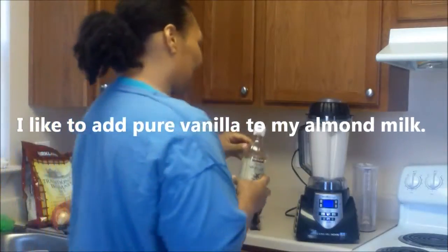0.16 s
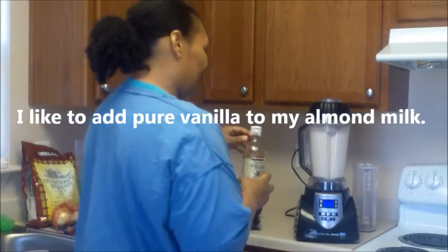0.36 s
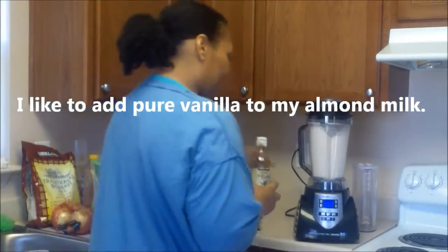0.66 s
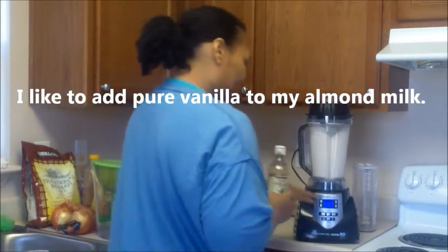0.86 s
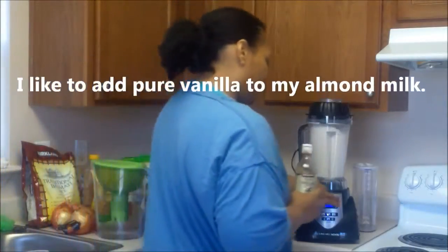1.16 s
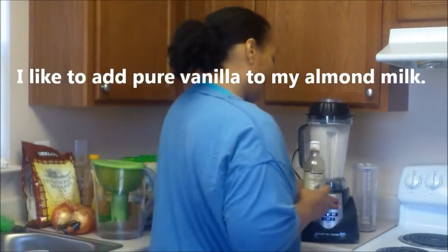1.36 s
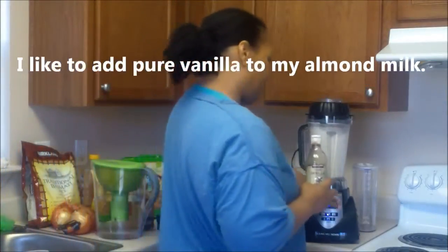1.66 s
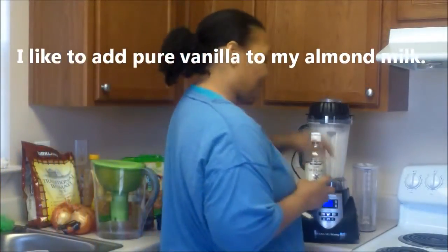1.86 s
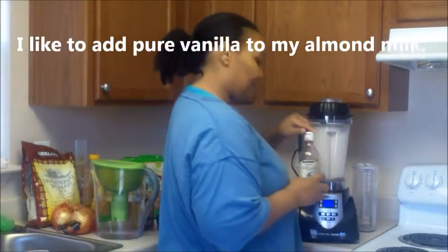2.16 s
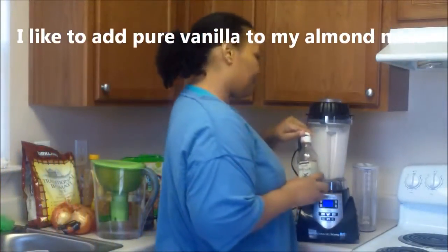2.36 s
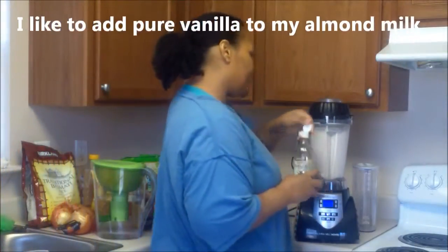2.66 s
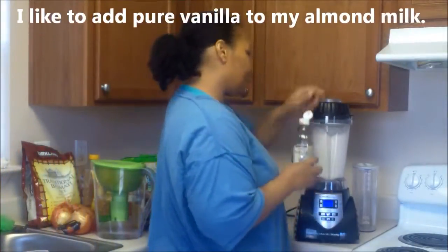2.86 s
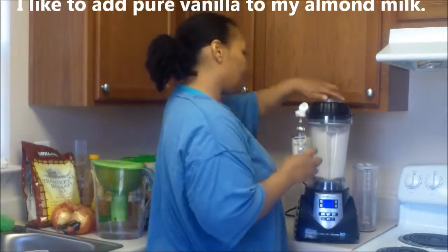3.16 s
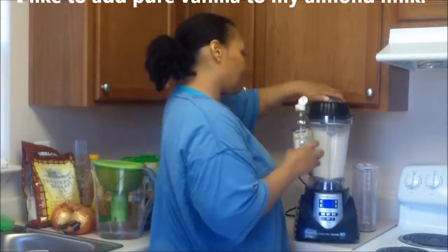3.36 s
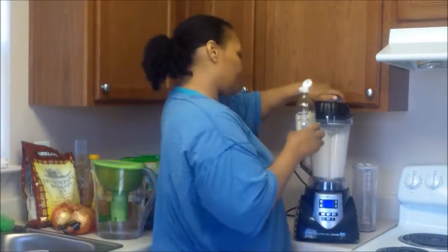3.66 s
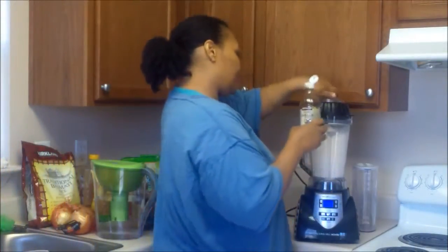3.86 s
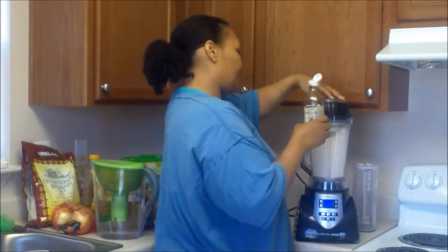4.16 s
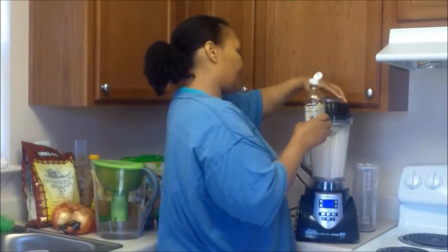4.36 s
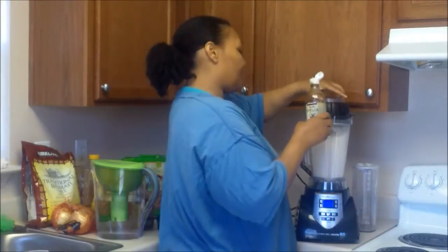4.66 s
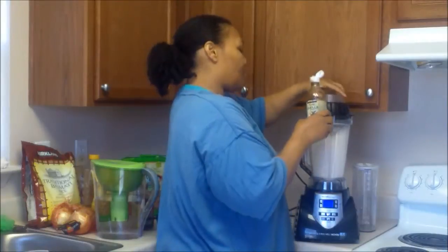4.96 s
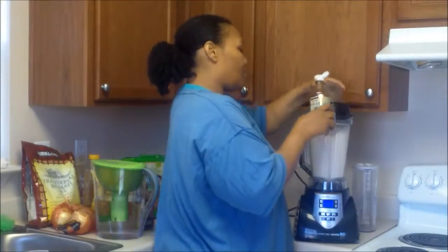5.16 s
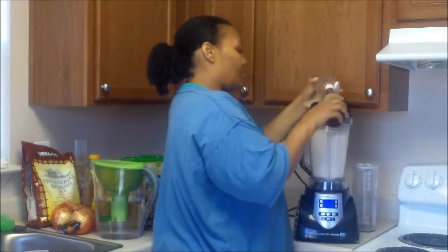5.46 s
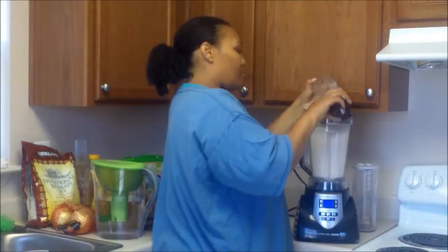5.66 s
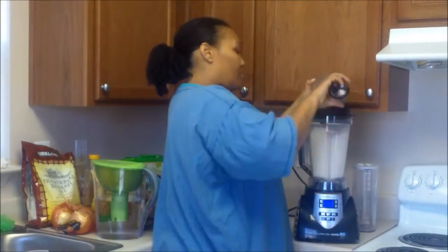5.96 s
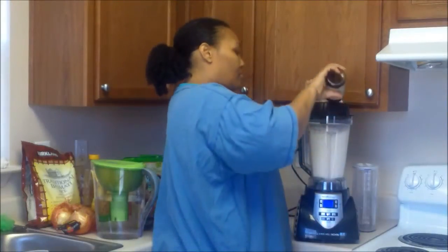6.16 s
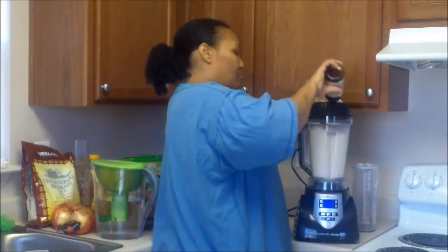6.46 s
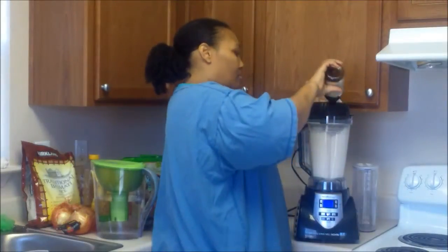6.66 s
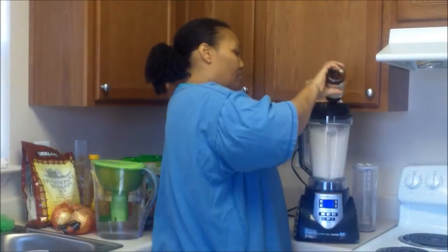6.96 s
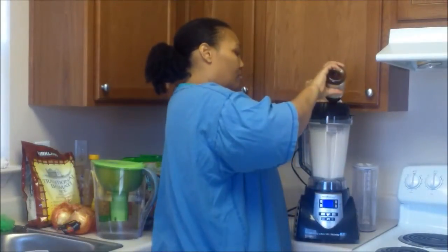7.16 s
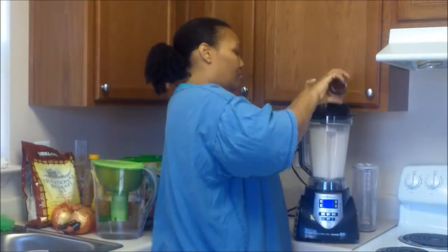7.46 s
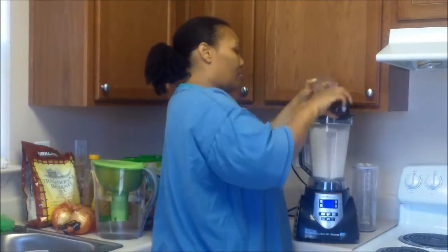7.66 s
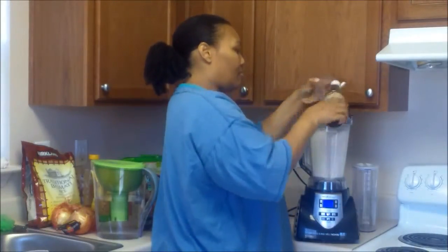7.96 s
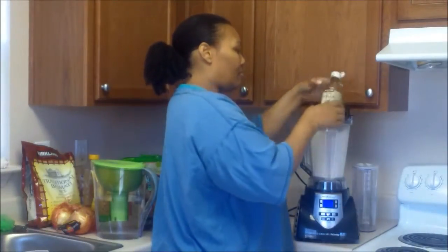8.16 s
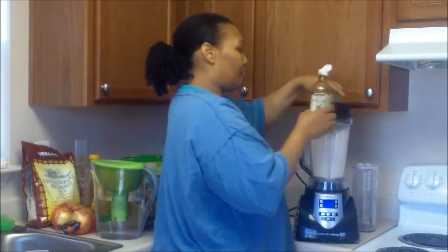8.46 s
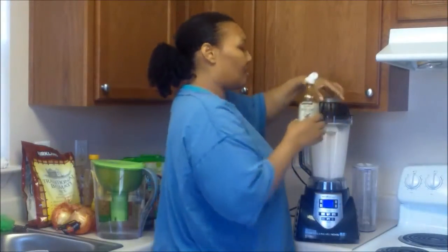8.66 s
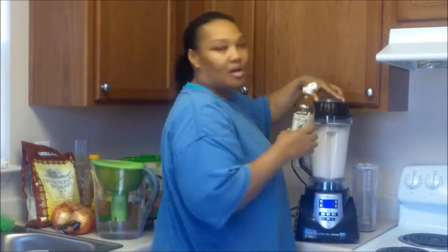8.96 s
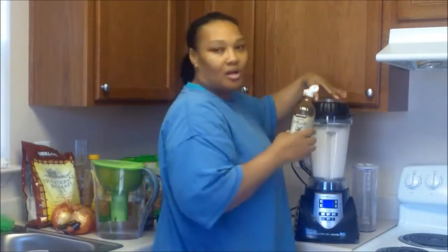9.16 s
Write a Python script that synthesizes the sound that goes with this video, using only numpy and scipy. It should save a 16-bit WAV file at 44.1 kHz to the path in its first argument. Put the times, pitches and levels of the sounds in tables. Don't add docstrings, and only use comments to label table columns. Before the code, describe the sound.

Loud, unbroken blender roar, close to constant in level, with a buzzing motor tone that wavers slightly in pitch. The liquid adds rough flutter and small airy gulps. After five seconds the opened jar sounds hollower and the motor overtones sing out more; after eight it closes again. Small room with short hard reflections, heard from a couple of metres on a simple microphone.

```python
import sys
import numpy as np
from scipy import signal
from scipy.fft import rfft, irfft
from scipy.io import wavfile
from scipy.ndimage import uniform_filter1d

SR = 44100
rng = np.random.default_rng(int(sys.argv[2]) if len(sys.argv) > 2 else 0)


def store_wav(level_fs):
    pcm = np.round(np.clip(np.atleast_2d(level_fs), -1, 1) * 32767)
    wavfile.write(sys.argv[1], SR, pcm.T.astype(np.int16))


def undo_db(level):
    steps = np.asarray(level, float) / 20
    return 10 ** steps


N = 410571
HZ = np.fft.rfftfreq(N, 1 / SR) + 1e-3

# [t/s, f/Hz]
SHAFT_SPEED = [(0.0, 295), (.35, 298.2), (1.1, 296.7), (1.55, 292), (1.78, 290.7), (2.0, 296.2),
               (2.4, 298.3), (2.85, 295.5), (5.3, 296.4), (5.55, 303.7), (6.05, 303), (6.4, 299.9),
               (7.1, 295), (7.55, 298), (7.78, 292.5), (8.15, 300.3), (8.95, 299.3), (9.31, 294.3)]
# [t/s, level/dB]
HUM = [(0, -32), (.2, -28), (1.15, -28), (1.6, -38), (1.82, -41), (2.0, -33), (2.45, -28), (2.85, -32.5),
       (3.4, -29), (3.7, -35.5), (4.2, -31), (5.1, -29), (5.45, -31), (6.2, -29), (7.7, -26.5),
       (8.25, -36.5), (8.75, -28.5), (9.31, -35)]
ORDERS = (1, 2, 3, 4, 44)
# [level at usual speed/dB, gain per extra Hz/dB, slow wander/dB]
OVERTONES = [(-44.5, -.3, 2), (-44.5, .5, .6), (-40, -.3, 1.5), (-54, -.5, 1.5)]
# [level/dB, phase/rad]
FLICKER = [(1.2, .15), (1.8, .4), (1.5, .8), (1.5, .25), (1.5, .3)]
# [t/s, length/s, order, lift/dB]
SINGS = [(.7, 0.55, 4, 4.5), (1.199, .7, 44, 3), (1.45, .5, 2, 3.5), (1.55, .3, 4, 4.5),
         (2.38, 0.077, 3, 8), (2.9, 0.61, 44, 4), (3.4, 1.03, 4, 5.5), (4.8, 0.22, 2, 8),
         (5.5, 0.66, 3, 11), (5.4, 1.2, 4, 6), (6.15, 0.34, 2, 10), (6.4, .25, 44, 6),
         (6.299, 1.05, 3, 10.5), (6.9, 1.05, 44, 5), (7.72, 0.18, 2, 12), (7.75, 0.57, 4, 8),
         (8.0, 0.52, 3, 9), (8.33, 0.19, 2, 8), (8.55, .8, 4, 8), (9.05, 0.32, 44, 6), (9.15, .3, 2, 10)]
USUAL_HZ, SING_FADE_S = 297, 0.11

# [t/s, level/dB]
ROAR = [(0.0, -14.5), (0.1, -14), (0.26, -17), (1.37, -14.5), (1.68, -17), (2.33, -14.5), (2.87, -15),
        (3.14, -14.5), (4.77, -14.5), (5.47, -14), (6.01, -16), (6.98, -14.5), (7.73, -15), (8.97, -14.5),
        (9.31, -15)]
# [f/Hz, density/dB per Hz]
ROAR_COLOUR = [(110, -56), (190, -33.5), (261, -17), (294, -11), (436, -13.5), (645, -14), (927, -11),
               (1270, -12), (1440, -7), (1800, -10), (2430, -9), (6390, -4), (7000, -6.5), (9100, -37),
               (15400, -120)]
# Jar, base and cupboard resonances [f/Hz]
MODE_HZ = (232, 590, 728, 915, 956, 1038, 1411, 1462, 1545, 1614, 2038, 2408, 2497, 2682, 2870, 2971, 3391,
           3744, 4072, 4554, 4855, 5157, 6230, 6495, 6707, 6922, 7685, 8476, 8640, 9108)
# [width/Hz, lift/dB]
MODE_SHAPE = [(28, 8), (30, 3.5), (21, 5), (40, 4), (22, 5), (19, 3.5), (20, 6), (27, 6.5), (22, 7),
              (24.8, 1), (45.3, 7.5), (41.2, 7.5), (35, 5), (22, 7), (36, 6.5), (28, 3), (29.6, 6),
              (68.6, 2.5), (90, 3.5), (70, -3), (80, 2), (70, 3), (32, 5.5), (50, 1), (30, 5), (35, 3.5),
              (120, 2.5), (35, 7.5), (70, 5), (56, 2)]
# [f/Hz, level/dB]
CAPSULE = [(6600, -1), (6900, -1), (7300, -6.5), (8100, -6.5), (8700, -1), (9500, -4.5), (10300, -10),
           (12500, -20), (14000, -21), (15700, -23.5)]
# [t/s, ramp/s]
STEP_ASIDE = [
    (2.0, 0.35),
    (4.3, 0.53),
]
ROAR_USUAL_DB, WALL_CLEAR_DB, LOW_OPEN_DB = -14, -0.1, 0.7
LOW_SHADE, WALL_SHADE, TOP_SHADE = 0.98, 1, 1

# [t/s, ramp/s]
CAP_OFF = (4.96, .5)
POUR_ON = (6.2, 0.83)
POUR_OFF = (7.85, 0.22)
CAP_ON = (8.3, 0.34)

# [f/Hz, width/Hz, level/dB]
BOOM_MODES = [(338.7, 25, -0.5), (382, 30, -4), (422, 32, -13), (509, 65, -11.5), (546, 68, -16.5)]
# [t/s, lift/dB]
GULPS = [(1.95, 4), (4.05, 4), (4.35, 3.95), (4.98, 3), (5.34, 4), (5.83, 3), (6.2, 3), (6.56, 4),
         (7.03, 1), (7.38, 4.3), (7.8, 6.2), (8.06, 3.6), (8.26, 4), (8.97, 6)]
BOOM_SHUT_DB, BOOM_OPEN_DB, BOOM_POUR_DB = -36, 5.5, 4.5
GULP_S, RANDOM_GULP_DB = 0.047, 1.5
SETTLE_S, SETTLE_DB = 0.79, -10

# [f/Hz, density/dB per Hz]
RUMBLE = [(4.7, -31), (8.0, 2), (16, 2), (27, -0.5), (107, -12.5), (145, -9), (183, -9), (199, -22),
          (210, -3), (270, -27), (460, -120)]
RUMBLE_DB = -45.5

# [t/s, centre f/Hz]
SIDE_NOISE = [(1.719, 10300), (1.719, 13100), (1.789, 8450), (2.044, 15100), (3.809, 11770), (3.809, 15100),
              (3.878, 11000), (3.878, 15100), (4.645, 4800), (4.714, 5260), (5.388, 9070), (5.388, 15100),
              (5.806, 10300), (5.806, 14800), (6.084, 13420), (6.572, 11000), (7.106, 8850), (7.478, 14500),
              (7.942, 10000), (7.965, 6900), (7.965, 12400), (8.081, 7600), (8.244, 13050), (8.522, 5800),
              (8.522, 13200), (8.987, 15100)]
# [f/Hz, density/dB per Hz]
SIDE_COLOUR = [(7000, 0), (10000, -3), (11500, -8)]
# [f/Hz, level/dB]
SIDE_LEVEL = [(4800, -28), (5500, -25), (9000, -28), (10300, -35), (13000, -43), (15100, -46)]
SIDE_WIDTH_HZ = 1300


def curves(table):
    s, *columns = np.transpose(table)
    return [np.interp(np.arange(N) / SR, s, column) for column in columns]


def ramp(at, length):
    return np.clip((np.arange(N) / SR - at) / length, 0, 1)


def walk(rate):
    k = int(SR / rate)
    held = np.repeat(rng.standard_normal(N // k + 1), k)
    return 1.34 * uniform_filter1d(uniform_filter1d(held, k), k)[:N]


def unit(x):
    return x / np.sqrt(np.mean(x ** 2))


def slope(points):
    hz, db = np.transpose(points)
    return undo_db(np.interp(np.log(HZ), np.log(hz), db))


def resonance(hz, width_hz):
    return 1 / (1 + ((HZ ** 2 - hz ** 2) / (HZ * width_hz)) ** 2)


def motor():
    hz, = curves(SHAFT_SPEED)
    levels_db = curves(HUM)
    for usual_db, per_hz, wander_db in OVERTONES:
        levels_db.append(usual_db + per_hz * (hz - USUAL_HZ) + wander_db * walk(rate=4))
    for at, length, order, lift_db in SINGS:
        k = ORDERS.index(round(order))
        path = ramp(at - SING_FADE_S, SING_FADE_S) - ramp(at + length, SING_FADE_S)
        levels_db[k] = levels_db[k] + lift_db * path
    turn = 2 * np.pi * np.cumsum(hz * (1 + 0.0014 * walk(rate=30))) / SR
    tones = 0
    for order, db, (rough_db, shake) in zip(ORDERS, levels_db, FLICKER):
        strength = undo_db(db + rough_db * walk(rate=36)) * np.sqrt(2)
        tones = tones + strength * np.sin(order * turn + shake * walk(rate=45))
    return tones


def roar():
    shade_db = curves(ROAR)[0] - ROAR_USUAL_DB
    lift_db = sum(db * resonance(hz, width) for hz, (width, db) in zip(MODE_HZ, MODE_SHAPE))
    noise = rfft(rng.standard_normal(N))
    spectrum = noise * slope(ROAR_COLOUR[:-2]) * slope(CAPSULE) * undo_db(lift_db)
    middle = irfft(spectrum * (HZ > 2500) * (HZ < 7200), N)
    spectrum /= np.sqrt(np.mean(middle ** 2))

    open_db = LOW_OPEN_DB * (ramp(*CAP_OFF) - ramp(*CAP_ON))
    wall_db = WALL_CLEAR_DB * (ramp(*STEP_ASIDE[0]) - ramp(*STEP_ASIDE[1]) - 0.3)
    shares = [LOW_SHADE * shade_db + open_db, WALL_SHADE * shade_db + wall_db,
              shade_db, TOP_SHADE * shade_db]
    out, step = 0, 1 / 3
    for octave in np.arange(-2.5, 4.2, step):
        distance = np.clip((np.log2(HZ / 1000) - octave) / step, -1, 1)
        window = np.cos(np.pi / 2 * distance) ** 2
        share_db = shares[np.searchsorted([0.2, 1.3, 2.85], octave)]
        surge_db = 0.48 * walk(rate=2.98) + 0.34 * walk(rate=12)
        out = out + undo_db(ROAR_USUAL_DB + share_db + surge_db) * irfft(spectrum * window, N)
    return out


def kitchen(x, t60=0.21, wet_db=-17):
    t = np.arange(int(0.4 * SR)) / SR
    tail = rng.standard_normal(len(t)) * np.exp(-np.log(1000) * t / t60) * (t > 0.004)
    echoes = signal.fftconvolve(x, tail / np.sqrt(np.sum(tail ** 2)))[:N]
    return x + undo_db(wet_db) * echoes


def boom_db():
    t = np.arange(N) / SR
    settling = 1 - ramp(SETTLE_S / 2, SETTLE_S / 2)
    db = BOOM_SHUT_DB + SETTLE_DB * settling + RANDOM_GULP_DB * walk(rate=9)
    db = db + BOOM_OPEN_DB * (ramp(*CAP_OFF) - ramp(*CAP_ON))
    db = db + BOOM_POUR_DB * (ramp(*POUR_ON) - ramp(*POUR_OFF))
    return db + sum(lift_db * np.exp(-((t - at) / GULP_S) ** 2) for at, lift_db in GULPS)


def boom():
    power = sum(undo_db(db) ** 2 * resonance(hz, width) ** 2 for hz, width, db in BOOM_MODES)
    air = irfft(rfft(rng.standard_normal(N)) * np.sqrt(power), N)
    swing = np.sqrt(uniform_filter1d(air ** 2, size=2600))
    return undo_db(boom_db() - 1.5) * unit(air / swing ** 0.33)


def rumble():
    return undo_db(RUMBLE_DB) * unit(irfft(rfft(rng.standard_normal(N)) * slope(RUMBLE), N))


def side_noise():
    size = 1536
    hz = np.fft.rfftfreq(size, 1 / SR)
    tilt = undo_db(np.interp(hz, *np.transpose(SIDE_COLOUR)))
    fade = np.sin(np.pi * np.arange(size) / size)
    out = np.zeros(N)
    noises = rng.standard_normal((len(SIDE_NOISE), size))
    for (at, centre_hz), noise in zip(SIDE_NOISE, noises):
        inside = abs(hz - centre_hz) < SIDE_WIDTH_HZ / 2
        band = unit(irfft(rfft(noise) * tilt * inside, size))
        db = np.interp(centre_hz, *np.transpose(SIDE_LEVEL))
        start = int(at * SR) - size // 2
        out[start:start + size] += undo_db(db + 3.5) * fade * band
    return out


def scene():
    mono = motor() + kitchen(roar()) + boom() + rumble()
    return np.array([mono, mono])


def roll_off(x):
    return signal.sosfilt(signal.butter(12, 16590, fs=SR, output="sos"), x)


def record(dry):
    both = np.clip(dry, -0.93, 0.93) + side_noise() * np.array([[1], [-1]])
    mix = irfft(rfft(both) * (HZ < 15740), N)
    return roll_off(mix)


dry = scene()
out = record(dry)
store_wav(out)
```